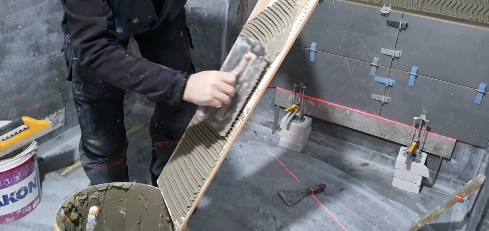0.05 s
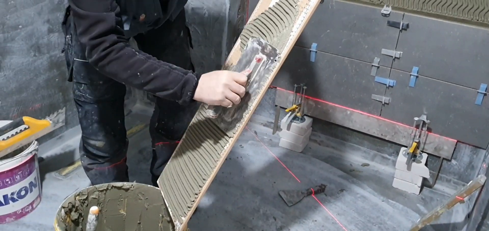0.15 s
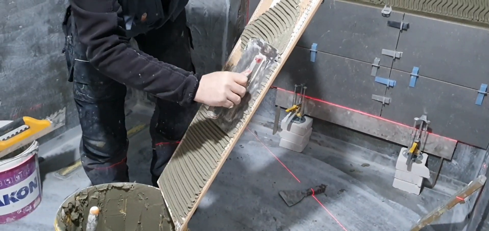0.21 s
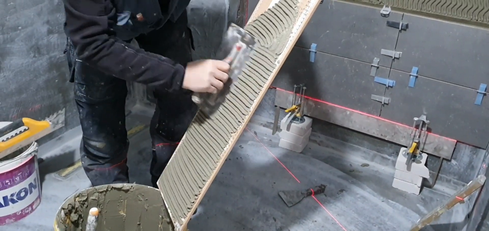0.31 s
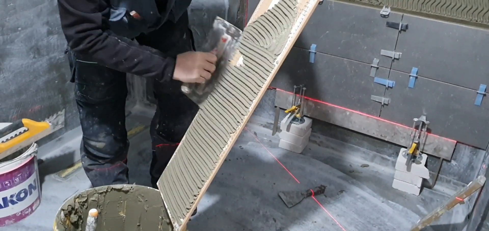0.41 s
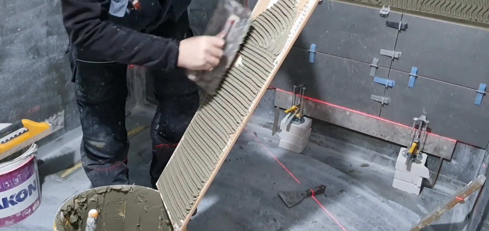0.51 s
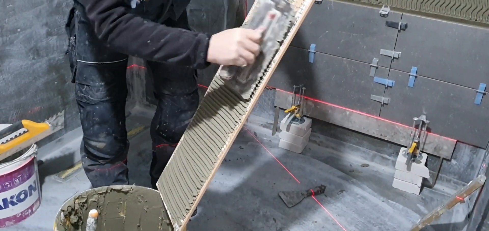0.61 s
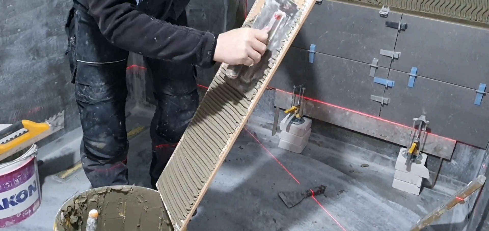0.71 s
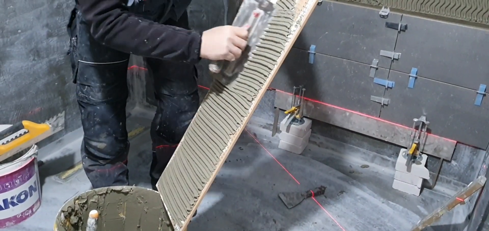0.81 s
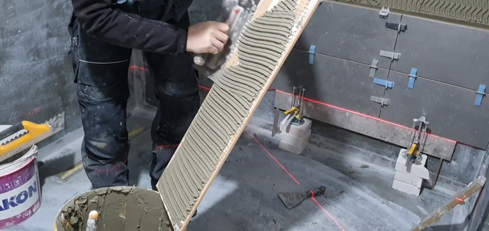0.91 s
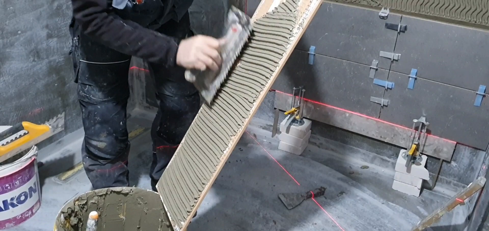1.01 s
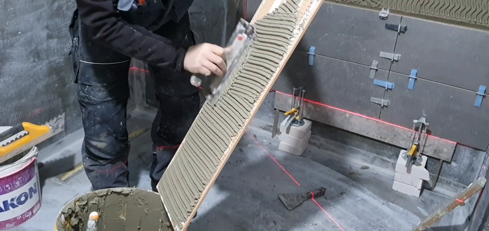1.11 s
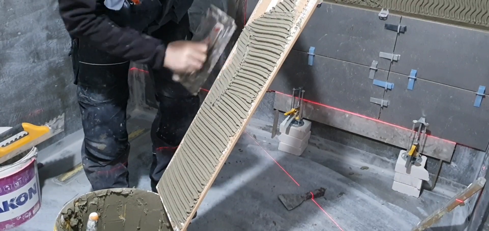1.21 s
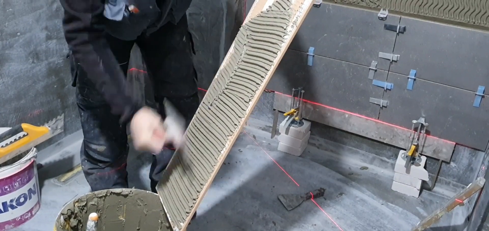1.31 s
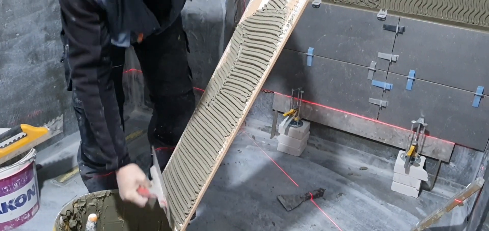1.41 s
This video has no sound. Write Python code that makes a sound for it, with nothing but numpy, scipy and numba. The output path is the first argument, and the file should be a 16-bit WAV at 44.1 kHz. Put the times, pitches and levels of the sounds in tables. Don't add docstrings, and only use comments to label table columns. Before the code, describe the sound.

Notched steel trowel scrapes gritty adhesive on a big tile, two strokes and a short flick

```python
import sys
import numpy as np
from scipy import signal
from scipy.fft import rfft, irfft
from scipy.io import wavfile
from scipy.ndimage import uniform_filter1d
from numba import njit

SR = 44100
rng = np.random.default_rng(int(sys.argv[2]) if len(sys.argv) > 2 else 0)


def master(y):
    cut = np.clip(np.atleast_2d(y).T, -1, 1)
    pcm = np.round(cut * 32767)
    wavfile.write(sys.argv[1], SR, pcm.astype(np.int16))


def level_to_linear(level):
    exponent = np.asarray(level, float) / 20
    return 10 ** exponent


N = 66150


def colour(x, points):
    f = np.fft.rfftfreq(N, 1 / SR) + 1
    hz, db = np.array(points).T
    gain = level_to_linear(np.interp(np.log(f), np.log(hz), db))
    return irfft(rfft(x) * gain, N)


def unit(x):
    return x / np.sqrt(np.mean(x ** 2))


def band(x, hz, kind):
    return signal.sosfilt(signal.butter(2, hz, kind, fs=SR, output="sos"), x)


def ring(x, modes):
    t = np.arange(SR // 2) / SR
    ir = np.zeros(len(t))
    for k, (hz, db, t60) in enumerate(modes):
        level = (-1) ** k * level_to_linear(db) / np.sqrt(t60)
        ir += level * np.sin(2 * np.pi * hz * t) * 1000 ** (-t / t60)
    return signal.fftconvolve(x, ir / np.sqrt(np.sum(ir ** 2)))


@njit
def moving_resonance(x, hz, q):
    y, b, l = np.empty(len(x)), 0., 0.
    for i in range(len(x)):
        g = np.tan(np.pi * hz[i] / SR)
        v = (b + g * (x[i] - l)) / (1 + g * (g + 1 / q))
        b, l, y[i] = 2 * v - b, l + 2 * g * v, v / q
    return y


def port_pair(hz, like, size):
    noise = rng.standard_normal((2, size))
    mid, side = band(noise, [hz / 1.5, min(hz * 1.5, 20000)], "band")
    like = np.clip(like, -.99, .99)
    return np.sqrt(1 + like) * mid + np.sqrt(1 - like) * side * np.array([[1], [-1]])


# pitch_hz, level_db
AIR = [(18, -67.5), (30, -25), (95, 6), (124, -22.5), (252, -14.5), (426, -12), (1910, -13), (16000, -35)]
# pitch_hz, t60_s, left_right_likeness, level_db
ROOM = [(61, 0.18, 0.75, -1), (133, 0.12, 0.89, 1), (271, 0.31, .82, -2.5), (621, 0.25, 0.64, 1),
        (1400, 0.24, -0.56, -2), (3350, 0.21, -0.15, -2.5), (5556, 0.18, -0.29, -1.), (9500, 0.1, 0.6, 1),
        (14500, 0.095, 0.14, -3.5)]


def room_air():
    air = sum(port_pair(hz, like, N) for hz, t60, like, db in ROOM)
    return level_to_linear(-66.5) * unit(colour(air, AIR))


def room(dry):
    hop, size = int(.02 * SR), SR // 3
    gap_s, late_db, late_stretch = .0014, -25, 2.36
    t = np.arange(size) / SR
    onset = 1 - np.exp(-(t / gap_s) ** 2)
    tail = []
    for hz, t60, like, db in ROOM:
        decay = 1000 ** (-t / t60) + level_to_linear(late_db) * 1000 ** (-t / t60 / late_stretch)
        tail.append((port_pair(hz, like, N), level_to_linear(db) * decay * onset))

    wet = np.zeros((2, N + 4 * hop + size))
    padded = np.pad(dry, (hop, 2 * hop))
    window = np.hanning(2 * hop) ** .5
    for i, at in zip(range(0, N + hop, hop), rng.integers(0, N - size, 80)):
        ir = sum(noise[:, at:at + size] * env for noise, env in tail)
        ir = ir / np.sqrt(np.sum(ir ** 2) / 2)
        piece = padded[None, i:i + 2 * hop] * window
        wet[:, i:i + piece.shape[1] + size - 1] += signal.fftconvolve(piece, ir, axes=1)
    return wet[:, hop:hop + N]


def grains():
    grains_per_s, scatter_db, biggest_db = 9000, 4, 13
    patchy_db, patches_per_s = 1.71, 90
    chance, sign, size = rng.random((3, N))
    size_db = np.minimum(-scatter_db * np.log(size + 1e-9), biggest_db)
    ticks = (chance < grains_per_s / SR) * np.sign(sign - .5) * level_to_linear(size_db)
    k = int(SR / patches_per_s)
    patches = np.repeat(rng.standard_normal(N // 100), k)[:N]
    return unit(ticks * level_to_linear(patchy_db * uniform_filter1d(patches, k // 2)))


# start_s, hold_s, level_db, tilt_db, free_ring_hz
TOUCHES = [
    (0.105, 0.039, -47.5, 4.5, 1506),
    (0.653, 0.054, -42.5, -2, 736),
    (1.095, 0.0055, -44, -4.5, 1904),
    (1.459, 0.044, -89.5, -8.5, 592),
]


def light_touches():
    attack_s, release_s, sag_db, flex_db = .003, .01, -6.5, -10
    touches = []
    for s, hold, db, tilt, hz in TOUCHES:
        path = [(s - attack_s, -25), (s, 0), (s + hold, sag_db), (s + hold + release_s, -30)]
        touches.append([(at, db + change, tilt, flex_db, hz) for at, change in path])
    return touches


# start_s, drag_level_db, tilt_db (towards the bright edge), tile_flex_db, free_ring_hz
BEFORE = [
    (-.01, -44.5, -12, 3, 700),
    (.022, -54.5, -11.5, 3.9, 704),
    (.035, -71.5, -6.5, 6.7, 800),
    (.09, -65, -14.5, 7.1, 1000),
]
UP = [
    (0.198, -56, 7, -23, 4000),
    (0.21, -41, 5.5, -30, 3090),
    (0.239, -36, 6, -7, 2940),
    (.256, -31, 7, -5.5, 1400),
    (0.302, -25, 4, 6, 2800),
    (.36, -22, 4, -12, 2960),
    (0.416, -22.5, 4, -7.5, 2840),
    (0.453, -28.5, 5, 0, 3250),
    (.468, -76, -18, 7, 2600),
]
BACK = [
    (.708, -79, 7.5, -4, 3000),
    (0.713, -36, 3, -4, 3000),
    (0.738, -39, 7, 1, 2540),
    (0.755, -26, 3, -9.5, 1200),
    (0.832, -27.5, 5, -3, 1300),
    (0.889, -27, 4.5, -7, 3240),
    (0.927, -23.5, 5.5, -3, 3970),
    (.96, -32.5, 4, 4.5, 900),
    (.995, -48, -1.5, 2.5, 735),
]
FLICK = [
    (1.099, -66.5, 2, 9, 2010),
    (1.158, -54.5, 9, 18, 1500),
    (1.164, -35, 6, 7, 684),
    (1.191, -26, 4.5, -14, 2230),
    (1.211, -36, 2.5, 6.5, 1500),
    (1.25, -55.5, -21, -2, 1266),
    (1.288, -76, 6, 3, 1200),
]


def contacts(t):
    drag, tilt, flex, free_hz = np.zeros(N), np.zeros(N), np.zeros(N), np.full(N, 1636.)
    for rows in light_touches() + [BEFORE, UP, BACK, FLICK]:
        s, level_db, tilt_db, flex_db, hz = np.array(rows).T
        push = level_to_linear(np.interp(t, s, level_db, left=-200, right=-200))
        on = push > drag
        drag = drag + push
        tilt[on] = np.interp(t, s, tilt_db)[on]
        flex[on] = np.interp(t, s, flex_db)[on]
        free_hz[on] = np.interp(t, s, hz)[on]
    return drag, tilt, flex, free_hz


# pitch_hz, level_db
GRIT = [(30, -17.5), (280, 5.5), (1000, 1), (4000, 8.5), (5500, -1), (9000, -9), (14000, -8),
        (16000, -11.5)]


def bare_grit(sand, drag, tilt, flex):
    body_hz, edge_hz = 850, 4140
    bare = unit(colour(sand, GRIT))
    edge = band(bare, edge_hz, "high") * level_to_linear(1.11 * tilt)
    middle = band(bare, [body_hz, edge_hz], "band")
    body = band(bare, [350, body_hz], "band") * level_to_linear(.67 * flex)
    rumble = level_to_linear(-22) * unit(band(bare, 220, "low")) * level_to_linear(flex)
    return drag * (edge + middle + body + rumble)


# pitch_hz, level_db, t60_s
BLADE = [(1950, 0, .015), (2190, 0, .015), (2420, 0, .015), (2700, 2, .015), (3000, 0, .015),
         (3330, 0, .015), (3520, 0, .015), (3930, 0, .015), (4300, -2, .012), (4800, -5, .008),
         (5400, -7, .008)]


def blade_ring(drag, tilt, free_hz):
    free_q = 2.8
    damped = level_to_linear(-8) * ring(grains() * drag * level_to_linear(1.02 * tilt), BLADE)[:N]
    drive = grains() * drag * np.sqrt(SR * free_q / np.pi / free_hz)
    return damped + level_to_linear(-4) * moving_resonance(drive, free_hz, free_q)


# pitch_hz, level_db, t60_s
TILE = [(278, 3, 0.037), (185, -15.5, 0.02), (531, -3.5, 0.035), (696, -5.5, 0.038), (930, 0.5, 0.037),
        (1059, 5, 0.013), (1199, 5, 0.02), (1400, 3, 0.017), (1760, 2.5, .03)]


def tile_ring(sand, drag, tilt, flex):
    bending = ring(sand * drag * level_to_linear(flex - 10.5), TILE[:2])
    plate = ring(grains() * drag * level_to_linear(-.32 * tilt), TILE[2:])
    return level_to_linear(-5.5) * (bending + plate)[:N]


# start_s, level_db, push_s
THUDS = [
    (1.111, -42, 0.0053),
    (0.16, -56, 0.01),
    (0.46, -33, 0.007),
    (0.95, -49.5, 0.0038),
]


def thuds(t):
    bumps = np.zeros(N)
    for s, db, push in THUDS:
        cycle = np.clip((t - s) / push / 2, 0, 1)
        bumps += level_to_linear(db) * np.sin(2 * np.pi * cycle) ** 3
    return bumps


# pitch_hz, level_db, t60_s
LIFTED = [(275, -5.5, 0.25), (554, -9, 0.36), (657.6, 0.5, 0.12), (946, 1, 0.1), (1210, 6.5, 0.23),
          (1950, -17, 0.144), (2210, -14, .14), (2463, -4, 0.1), (3020, -26, 0.14), (3635, -9, 0.11)]


def lifted_blade(t, sand, drag):
    lift_s = 1.14
    return level_to_linear(-7.5) * ring(sand * drag * (t > lift_s), LIFTED)[:N]


def trowel(t):
    sand = grains()
    drag, tilt, flex, free_hz = contacts(t)
    grit = bare_grit(sand, drag, tilt, flex)
    blade = blade_ring(drag, tilt, free_hz) + lifted_blade(t, sand, drag)
    return grit + blade + tile_ring(sand, drag, tilt, flex)


def scene():
    t = np.arange(N) / SR
    tool, bumps = trowel(t), thuds(t)
    wet = room(tool + level_to_linear(-1) * bumps)
    mix = (tool + bumps + level_to_linear(2.5) * wet) * level_to_linear(-2.5)
    left_right_db = np.array([[-.76], [0]])
    return mix * level_to_linear(left_right_db) + room_air()


def low_pass(x):
    return signal.sosfilt(signal.butter(12, 16790, fs=SR, output="sos"), x)


def record(dry):
    trimmed = band(dry, 50, "high")
    mix = signal.sosfilt(signal.ellip(8, .2, 70, 15950, fs=SR, output="sos"), trimmed)
    return low_pass(mix)


dry = scene()
out = record(dry)
master(out)
```